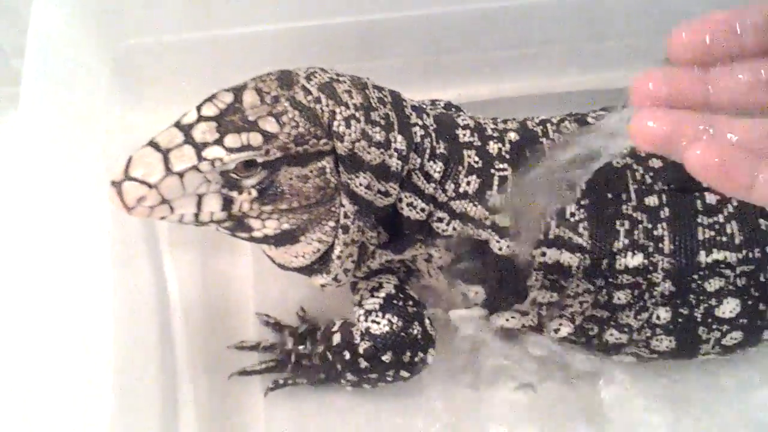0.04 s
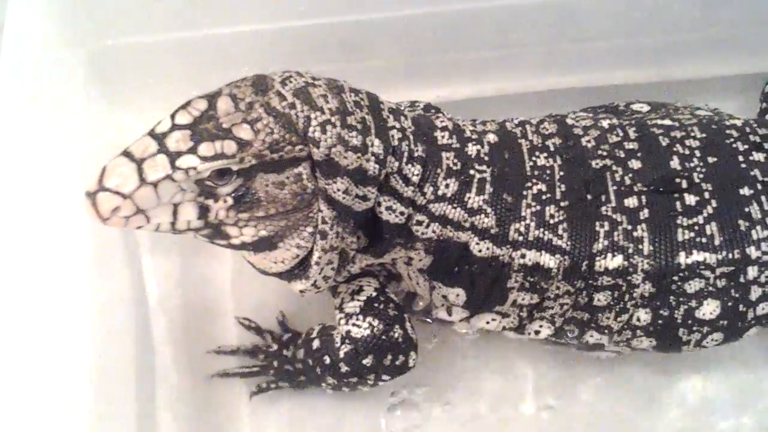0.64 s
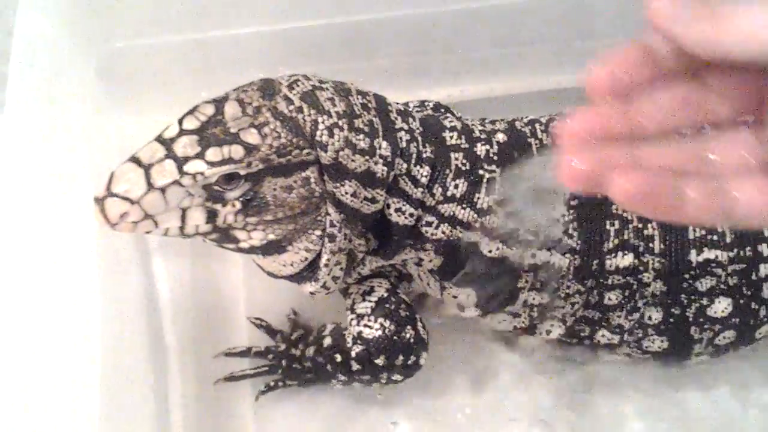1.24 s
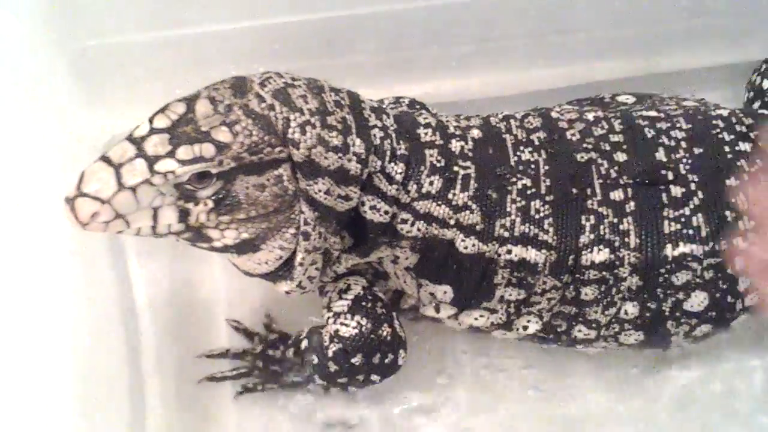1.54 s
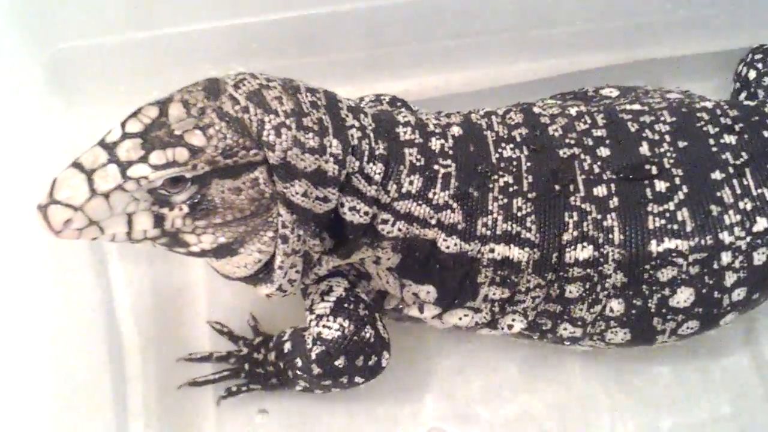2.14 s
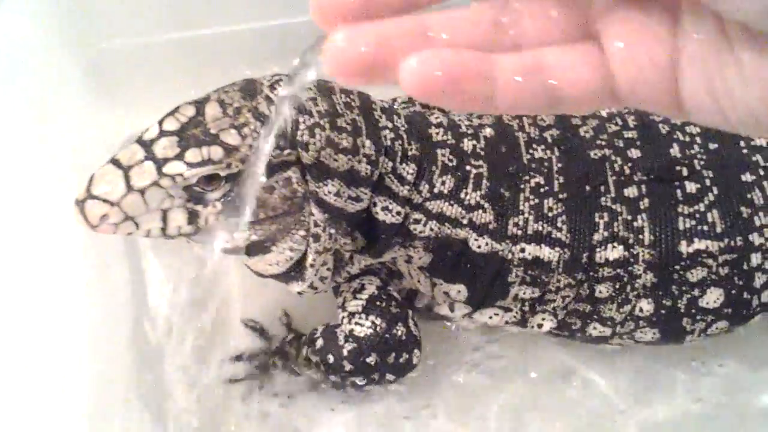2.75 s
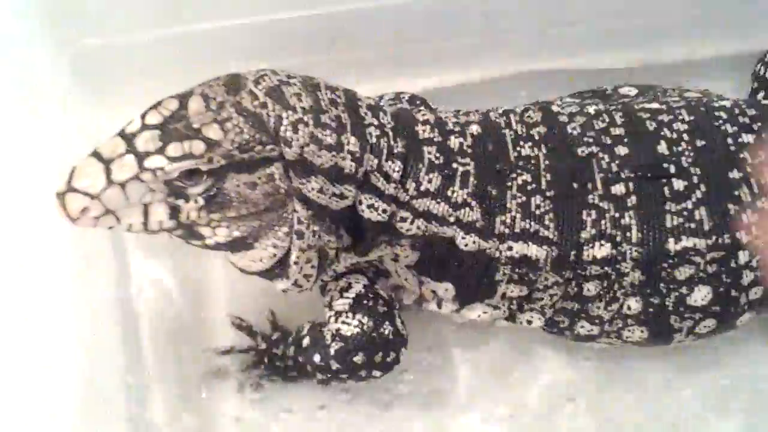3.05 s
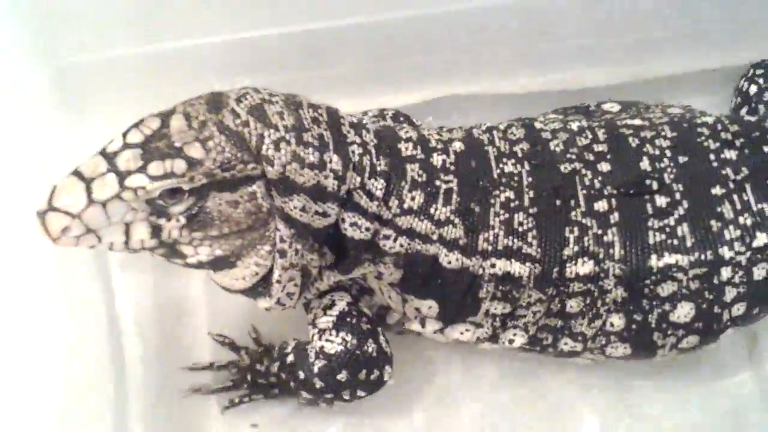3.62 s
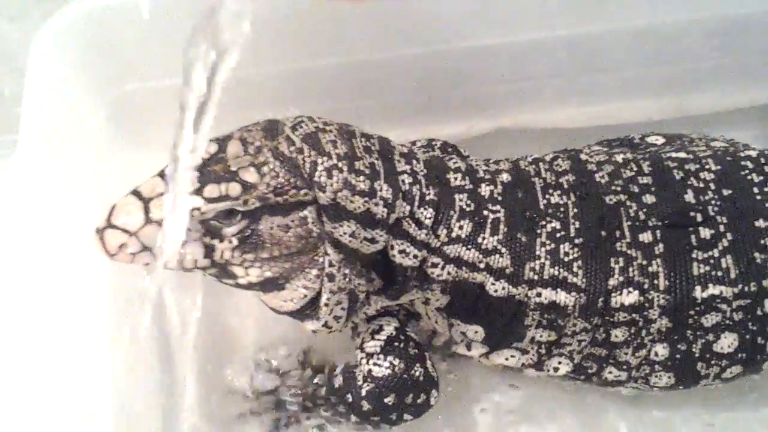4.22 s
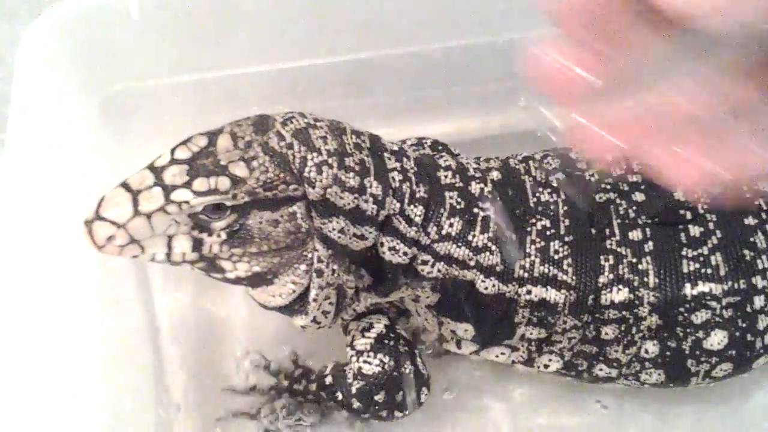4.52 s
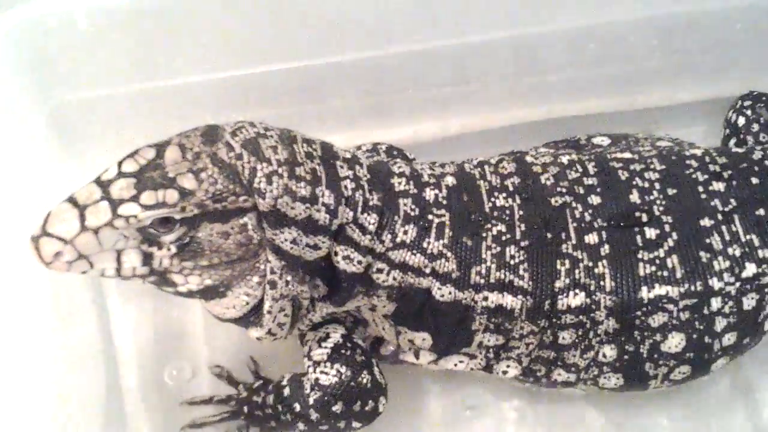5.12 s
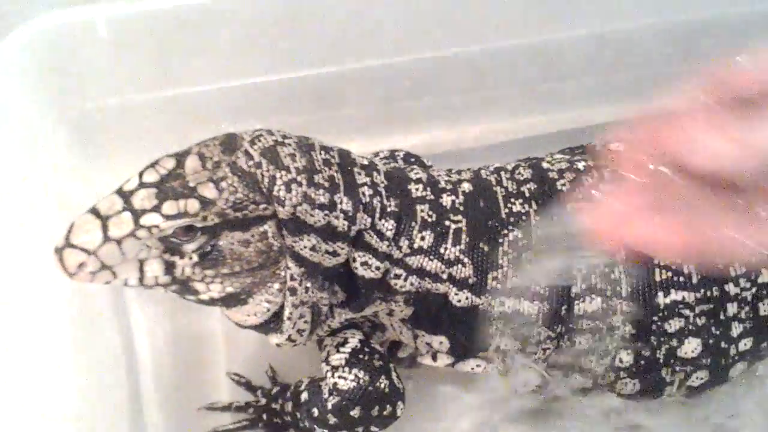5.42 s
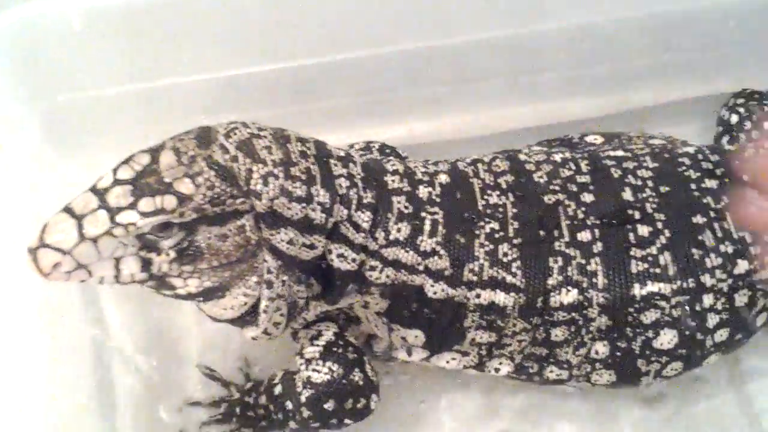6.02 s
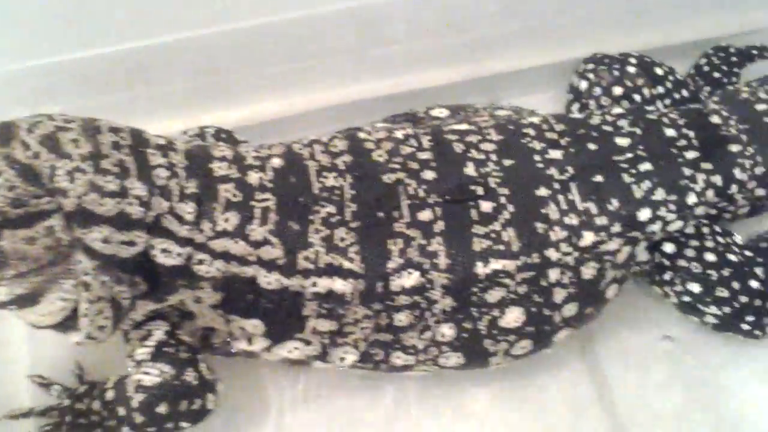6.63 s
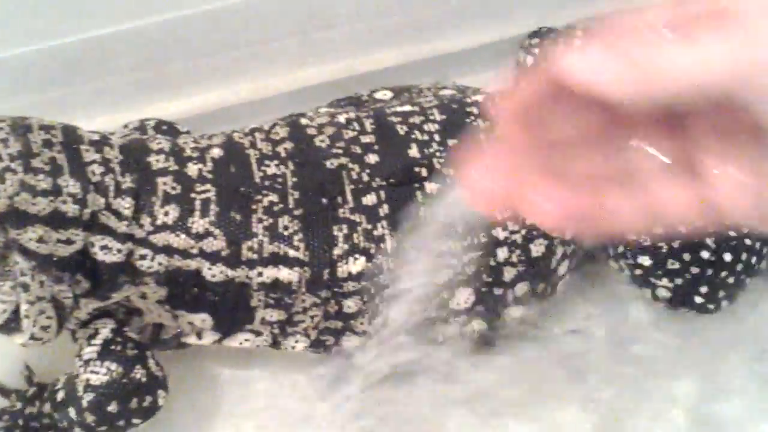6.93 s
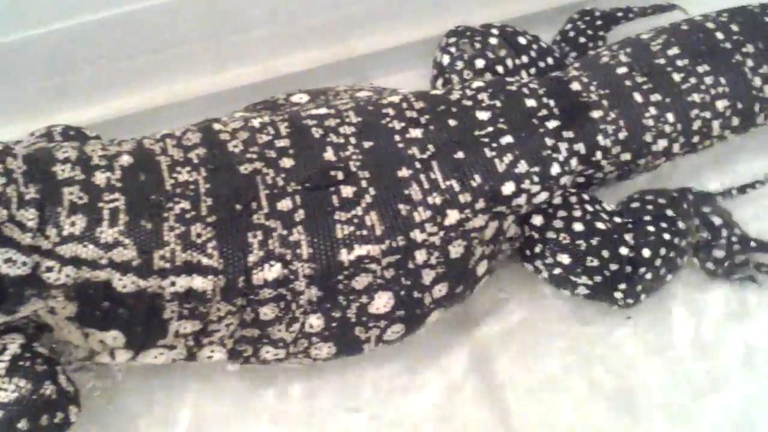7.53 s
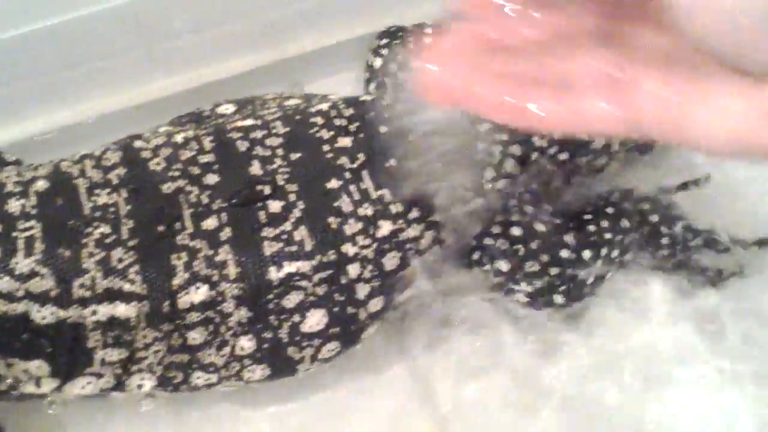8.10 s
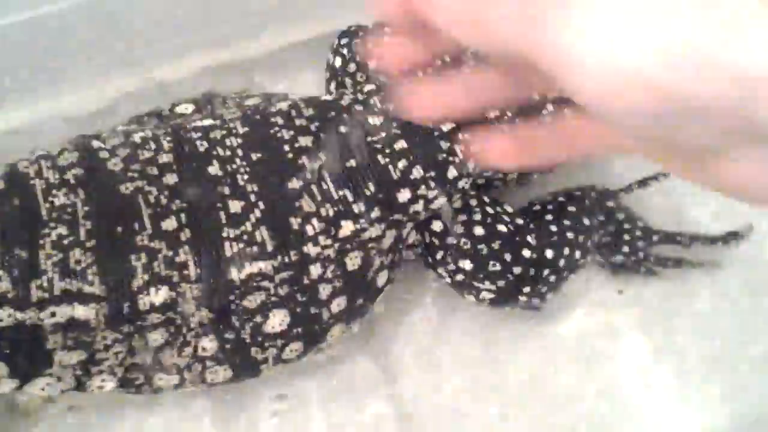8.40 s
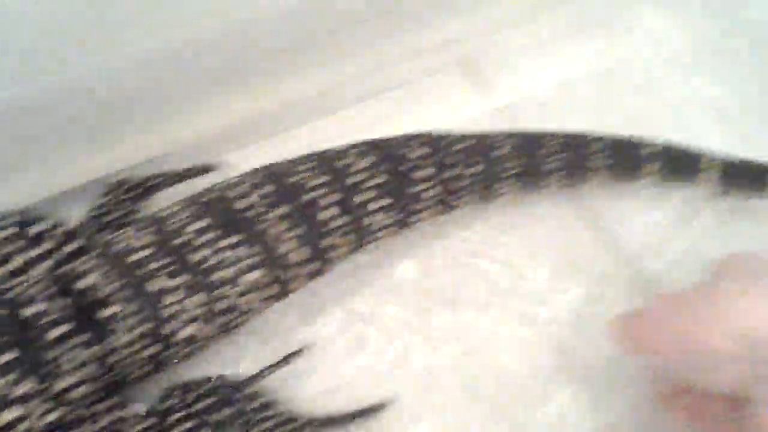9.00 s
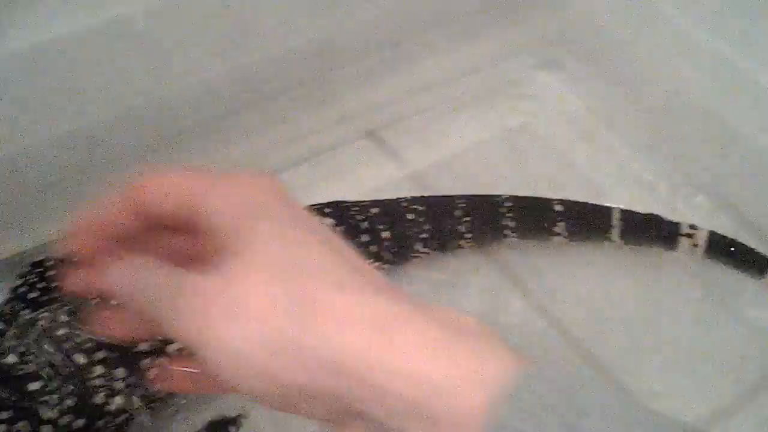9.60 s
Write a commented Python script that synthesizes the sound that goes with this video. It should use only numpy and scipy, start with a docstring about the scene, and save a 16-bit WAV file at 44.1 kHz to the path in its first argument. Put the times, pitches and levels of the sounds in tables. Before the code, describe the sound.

A hand scoops water from a shallow plastic tub and pours it over a large lizard, again and again. Each handful patters and gurgles on scales and water, followed by stray drops that slap and plink. Soft glugs come as the hand dips back in, and about halfway there is one rising plop. The microphone is close, in a small bathroom with a short ring and a faint hush.

```python
"""A small hard-walled bathroom, one mono microphone close to a shallow plastic tub of water.
Over a faint hush, a hand pours a scoop over a large lizard: it gurgles and patters on scales and water,
then stray drops slap and plink. The hand dips in with a run of glugs, lifts and pours, again and again.
About halfway, one big air cavity pinches off with a rising plop, and the scooping carries on.
Tub and walls ring on behind every splash."""
import sys
import numpy as np
from scipy import signal
from scipy.fft import rfft, irfft
from scipy.io import wavfile
from scipy.ndimage import uniform_filter1d

SR = 44100
rng = np.random.default_rng(int(sys.argv[2]) if len(sys.argv) > 2 else 0)


def unload_audio(sound):
    """Save the sound as a 16-bit wav file, at the path given as the first command line argument."""
    columns = np.transpose(np.atleast_2d(sound))
    # keep every value between -1 and 1, then stretch to whole-number steps
    steps = np.round(np.clip(columns, -1, 1) * 32767)
    wavfile.write(sys.argv[1], SR, steps.astype(np.int16))


N = 429975
TIME = np.arange(N) / SR

# the heaviest drops that slap the water; body and spray are relative to the drop's level:
# start_s, level_db, ring_hz, body_db, spray_db
HEAVY_DROPS = [(0.0146, -15, 4920, -14, -17), (0.039, -14.5, 4830, -13, -28), (0.102, -18, 4070, -14, -30),
               (0.2151, -21, 3860, -22, -24), (0.274, -21, 4300, -19, -23), (0.3466, -27.5, 5150, -21, -32),
               (0.8094, -34, 3930, -17, -35), (0.87, -33, 4450, -17, -28), (0.9728, -22.5, 3540, -25, -28),
               (1.018, -23, 4200, -15, -36), (1.083, -29, 4450, -19, -14), (1.106, -27.5, 4150, -15, -16),
               (1.137, -29, 3080, -12, -17), (1.2, -24, 3400, -4.5, -30), (1.3847, -25.5, 2430, -33, -23),
               (1.543, -31.5, 5460, -7.5, -7), (1.5951, -26, 4020, -16.5, -28),
               (1.9092, -24.5, 3560, -10.5, -21), (2.3285, -30, 4640, -5, -12),
               (2.426, -24.5, 4050, -9.5, -20), (2.475, -20.5, 3680, -30, -21),
               (2.4817, -28, 4400, -34, -16), (2.6332, -21, 4700, -22, -19),
               (2.6878, -27, 4840, -10.5, -23), (2.727, -23.5, 3600, -4, -18),
               (2.741, -26.5, 3650, -16, -18), (2.798, -19.5, 2900, -6.5, -18),
               (2.8174, -16.5, 4350, -14, -19), (2.8705, -15.5, 3770, -19, -18),
               (2.9347, -17.5, 4150, -10, -16), (3.345, -33.5, 4480, -30, -14),
               (3.4648, -24, 4330, -1, -29), (3.56, -23.5, 4470, -10, -37), (3.908, -24.5, 4470, -30, -33),
               (4.0062, -22.5, 4160, 1.5, -15), (4.043, -25, 3350, -11, -24),
               (4.071, -19, 4140, -10.5, -13.5), (4.0834, -20.5, 3830, -8, -23),
               (4.1137, -21.5, 4230, -17, -24), (4.1467, -27.5, 4200, 0.5, -22),
               (4.2695, -17.5, 2890, -11, -23), (4.2692, -16.5, 5660, -24, -30),
               (4.297, -13.5, 5250, -31, -25), (4.3334, -15, 3460, -17, -16), (4.3645, -29, 3820, 2.5, -20),
               (4.3942, -19.5, 3460, -5, -36), (4.4283, -19.5, 3370, -12, -19),
               (4.4778, -22, 3800, -10, -12.5), (4.533, -27.5, 4670, -17, -18),
               (4.63, -28.5, 4350, -18, -20), (4.9725, -31, 4200, -1.5, -19), (5.205, -23, 2290, -28, -35),
               (5.237, -31, 4240, -17, -28), (5.313, -28.5, 4200, -3.5, -22), (5.4897, -17, 2380, -30, -22),
               (5.5532, -16.5, 4830, -15, -16), (5.605, -22, 4220, -28, -22), (5.632, -20, 2920, -5, -27),
               (5.695, -15, 3540, -8, -17), (5.72, -23, 3300, 0, -13), (5.8307, -13.5, 4530, -19.5, -21),
               (5.839, -19, 4200, -18, -26), (5.8834, -17, 4860, -16, -34), (5.8894, -14.5, 4180, -7, -21),
               (5.9193, -21, 4100, 0, -20), (6.616, -31, 4730, -10, -35), (6.708, -26.5, 3450, -10, -27),
               (7.23, -21, 2930, -15, -14), (7.3032, -10.5, 4050, -34, -34),
               (7.7973, -28.5, 4400, -27, -22), (7.87, -19.5, 3360, -26, -45), (8.092, -25, 4350, -22, -21),
               (8.108, -20.5, 4200, -23, -20), (8.3074, -22, 5060, -14.5, -36), (8.364, -9, 3760, -17, -22),
               (8.767, -34, 4000, -3.5, -35), (8.7793, -27.5, 3650, -13, -23), (8.869, -25, 3670, -39, -25),
               (8.882, -24.5, 4330, -24, -28), (9.254, -17, 3879, -26, -45), (9.337, -23, 2390, -18, -20),
               (9.473, -23, 4780, -11, -19), (9.5632, -21, 3710, -34, -12), (9.6127, -26, 3380, -29, -31)]
# the larger trapped bubbles: start_s, pitch_hz, level_db, life_ms, rise_fraction
AIR_POCKETS = [(0.016, 1160, -13, 3.3, 0.055), (0.124, 1756, -17.5, 5, 0.026),
               (0.851, 1430, -37.5, 6.3, 0.13), (1.083, 1760, -27, 5.9, 0.05),
               (1.203, 1163, -21.5, 7.4, 0.052), (1.224, 1083, -25.5, 9.7, 0.28),
               (1.274, 1734, -22.5, 5.5, 0.066), (1.969, 1010, -24.5, 11, 0.022),
               (1.987, 3150, -27.5, 4.9, 0.018), (2.228, 737, -27, 17, 0.12), (2.243, 825, -30, 13, 0.32),
               (2.332, 1460, -26, 10, 0.08), (2.52, 1340, -18.5, 6, 0.073), (2.589, 1354, -20.5, 5.1, 0.3),
               (2.701, 1754, -24.5, 5.8, 0.06), (2.908, 1070, -11, 2.04, 0.05),
               (3.466, 1010, -30, 16, 0.054), (3.482, 1690, -23, 3.4, 0.054),
               (3.703, 1072, -26.5, 11.7, 0.32), (3.779, 1348, -14.5, 6, 0.11), (4.203, 830, -21, 3.4, 0.1),
               (4.274, 1420, -18, 3.9, 0.04), (4.397, 426, -22.5, 10.8, 0.22),
               (4.463, 1820, -23, 3.7, 0.055), (4.512, 900, -30, 10, 0.3), (5.047, 850, -24, 5.4, 0.39),
               (5.109, 1010, -29, 6.1, 0.11), (5.246, 1450, -24, 3.9, 0.062), (5.489, 1910, -19, 4.7, 0.05),
               (5.532, 2094, -26.5, 12, 0.05), (5.581, 1860, -17, 4.9, 0.045),
               (6.615, 2910, -21, 2.8, 0.08), (6.707, 986, -19.5, 6.5, 0.054),
               (6.763, 1430, -16.5, 2.9, 0.08), (6.8, 1675, -21.5, 6, 0.068),
               (6.899, 900, -22.5, 11.5, 0.26), (6.929, 1810, -23.5, 5.9, 0.11),
               (6.971, 1008, -28.5, 14, 0.36), (7.162, 1020, -25, 4, 0.05), (7.268, 1014, -32, 19, 0.64),
               (7.586, 2150, -31.5, 3.7, 0.03), (7.592, 2000, -32.5, 5.1, 0.06),
               (7.601, 1570, -37, 6.4, 0.03), (7.853, 1860, -32.5, 4.7, 0.11),
               (7.974, 1360, -21.5, 4.4, 0.1), (8.215, 813, -36.5, 14, 0.033),
               (8.478, 1800, -27.5, 5.2, 0.2), (8.8, 883, -29.5, 9, 0.1), (8.816, 770, -28.5, 14, 0.21),
               (9.215, 1040, -31.5, 5.3, 0.1), (9.286, 2070, -24.5, 5.9, 0.04),
               (9.337, 1670, -19, 3.8, 0.045), (9.614, 1240, -27, 5.3, 0.037)]
# the hand going under: start_s, length_s, first_hz, last_hz, glug_db, stir_db
HAND_DIPS = [(0.641, 0.023, 1350, 385, -40, -59.5), (1.881, 0.05, 2700, 294, -40.5, -48),
             (3.383, 0.067, 2440, 453, -41.5, -52.5), (4.958, 0.052, 2230, 410, -38.5, -54),
             (5.115, 0.028, 2800, 1510, -40, -47), (6.4, 0.08, 1800, 288, -39.5, -58.5),
             (7.62, 0.03, 1170, 260, -40, -60.5), (8.773, 0.036, 2000, 1080, -41, -48.5),
             (9.194, 0.042, 2040, 1620, -31.5, -54)]


def undb(db):
    """Decibels to gain."""
    return 10 ** (np.asarray(db) / 20)


def unit(x):
    """Scale to rms 1."""
    return x / np.sqrt(np.mean(x ** 2))


def add(track, start_s, sound):
    """Mix a sound into the track."""
    start = int(np.clip(start_s * SR, 0, N - 1))
    track[start:start + len(sound)] += sound[:N - start]


def colour(x, points):
    """Shape a sound by rows of frequency_hz, gain_db; the filter is causal, so attacks stay sharp."""
    size = 8192
    hz, db = np.transpose(points)
    bin_hz = np.arange(size // 2 + 1) * SR / size + 1
    log_gain = np.log(undb(np.interp(np.log(bin_hz), np.log(hz), db)))
    cepstrum = irfft(log_gain)[:size // 2]
    response = irfft(np.exp(rfft(np.r_[cepstrum[0], 2 * cepstrum[1:]], size)))
    return signal.fftconvolve(x, response)[:len(x)]


def burst(age, lo_hz, hi_hz, swell_s):
    """An impact: a band of noise that swells and dies away."""
    spectrum = rfft(rng.standard_normal(len(age)))
    hz = np.arange(len(spectrum)) * SR / len(age) + 1
    band = 1 / (1 + (lo_hz / hz) ** 8) / (1 + (hz / hi_hz) ** 8)
    fade = (age / swell_s * np.exp(1 - age / swell_s)) ** 2
    return unit(irfft(spectrum * band, len(age)) * fade) * np.sqrt(np.mean(fade ** 2))


def bubbles(start_s, hz, db, life_s, rise):
    """One bubble per entry: each rings, climbs in pitch as it nears the surface, and bursts."""
    start_s, hz, db, life_s, rise = np.broadcast_arrays(start_s, hz, db, life_s, rise)
    samples = (2 * life_s * SR).astype(int) + 2
    # all bubbles end to end: which one a sample belongs to, and how far into it
    which = np.repeat(np.arange(len(start_s)), samples)
    step = np.arange(len(which)) - (np.cumsum(samples) - samples)[which]
    spent, cycles = step / SR / life_s[which], step / SR * hz[which]
    ring = np.sin(2 * np.pi * cycles * (1 + rise[which] * spent ** 2 / 3))
    envelope = (1 - np.exp(-cycles)) * np.exp(-spent ** 3)
    start = np.maximum(start_s * SR, 0).astype(int)
    return np.bincount(start[which] + step, undb(db)[which] * envelope * ring, N)[:N]


def gate(start_s, end_s, fall_db_per_s, rise_db_per_s=272):
    """Gain that climbs to 1 by the start, holds, and dies away after the end."""
    early_s, late_s = np.maximum(start_s - TIME, 0), np.maximum(TIME - end_s, 0)
    return undb(-rise_db_per_s * early_s - fall_db_per_s * late_s)


def room_tone():
    """The faint, steady, low hush of the bathroom."""
    # spectrum of the hush: frequency_hz, gain_db
    hush_spectrum = [(20, -16), (40, -3.5), (75, -4.5), (130, 3), (220, 5), (400, 4), (800, -1),
                     (1500, -12.5), (3000, -19), (5000, -7), (6500, -12.5), (13500, -8.5), (15000, -18)]
    return undb(-59.5) * unit(colour(rng.standard_normal(N), hush_spectrum))


def handful(lift_s, pour_s, empty_s, swell_db, sag_db):
    """Gain of one scoop: it is gathered, leaks through the fingers, pours thinner, runs off the scales."""
    gather = undb(-14) * gate(lift_s - 0.11, lift_s, fall_db_per_s=161)
    shape = undb(np.interp(TIME, [lift_s, pour_s, empty_s], [-swell_db, 0, -sag_db]))
    stream = gate(lift_s, empty_s, fall_db_per_s=161)
    runoff = undb(-8) * gate(lift_s, empty_s, fall_db_per_s=49.5)
    return np.maximum(shape * np.maximum(stream, runoff), gather)


def flow():
    """How hard the water patters, gurgles, sloshes and sprays as the hand dips, lifts and pours."""
    # scoops lifted and tipped out: lift_s, pour_s, empty_s, gurgle_db, patter_db, spray_db
    scoops = [(0.0, 0.036, 0.14, -40, -30.5, -62), (1.016, 1.234, 1.395, -43, -37, -51),
              (2.215, 2.253, 2.435, -44.5, -41.5, -56), (2.478, 2.534, 2.63, -41.5, -31.5, -48),
              (2.788, 2.813, 2.922, -42, -35.5, -54), (3.696, 4.042, 4.57, -40.5, -37, -49.5),
              (5.212, 5.26, 5.37, -42.5, -39.5, -52), (5.511, 5.69, 5.7, -44, -34.5, -43.5),
              (6.744, 7.05, 7.326, -38.5, -33.5, -46.5), (7.964, 8.132, 8.21, -43.5, -34.5, -45),
              (9.307, 9.49, 9.66, -45.5, -36.5, -54.5)]
    # the bath heaving against the tub: start_s, length_s, level_db
    heaves = [(0.01, 0.058, -46.5), (2.784, 0.24, -52), (3.413, 0.021, -49.5), (4.228, 0.23, -44),
              (4.99, 0.055, -45), (5.562, 0.22, -54), (5.826, 0.083, -43.5), (7.1, 0.15, -49),
              (8.37, 0.057, -49), (8.806, 0.021, -50.5)]
    patter, gurgle, spray = np.zeros((3, N))
    for *times, gurgle_db, patter_db, spray_db in scoops:
        patter += undb(patter_db) * handful(*times, swell_db=3.5, sag_db=4)
        gurgle += undb(gurgle_db) * handful(*times, swell_db=-0.5, sag_db=2.5)
        spray += undb(spray_db) * handful(*times, swell_db=6.5, sag_db=2)
    stir = sum(undb(db) * gate(start_s + length_s / 2, start_s + length_s + 0.004, fall_db_per_s=86)
               for start_s, length_s, *_, db in HAND_DIPS)
    slosh = sum(undb(db) * gate(start_s, start_s + length_s, fall_db_per_s=153)
                for start_s, length_s, db in heaves)
    return (np.hypot(patter, stir), np.hypot(gurgle, undb(3) * stir),
            np.hypot(slosh, undb(-24.5) * patter), np.hypot(spray, undb(-8.5) * stir))


def swarm(per_s, lo_hz, hi_hz, cycles, rise, spread_db):
    """A stream of bubbles of random size, mostly faint, each living for about the given cycles."""
    when, size, life, lift, force = rng.random((int(per_s * N / SR), 5)).T
    hz = lo_hz * (hi_hz / lo_hz) ** size
    life_s = cycles * (.5 + life) / hz
    return unit(bubbles(when * N / SR, hz, spread_db * force ** 3, life_s, 2 * rise * lift))


def wash():
    """Countless tiny droplets merge into a noise whose strength flutters."""
    flutter = signal.sosfilt(signal.butter(2, 90, fs=SR, output="sos"), rng.standard_normal(N))
    return unit(rng.standard_normal(N) * undb(3.7 * unit(flutter)))


def running_water(patter_gain, gurgle_gain, slosh_gain, spray_gain):
    """The pour patters and sprays, trapped air gurgles, and the bath sloshes round the hand."""
    # spectra of the four voices of the water: frequency_hz, gain_db
    patter_spectrum = [(500, -34), (1500, -7.5), (2600, -6.5), (3400, -2), (4500, 3), (5500, 0),
                       (6800, -11), (9000, -7.5), (15000, -25)]
    gurgle_spectrum = [(450, -7), (750, -18), (1100, 3), (1500, 11.5), (1900, 11.5), (2500, -6.5),
                       (3500, -26.5)]
    slosh_spectrum = [(90, -25), (160, -22), (270, -11.5), (420, -7), (600, -3.5), (780, 6), (1200, -16.5)]
    spray_spectrum = [(4000, -23), (7500, 0.5), (10500, 2.5), (14000, -3)]
    fizz = swarm(per_s=380, lo_hz=1800, hi_hz=6800, cycles=6.2, rise=0.071, spread_db=20.5)
    patter = unit(colour(fizz + undb(-6.5) * wash(), patter_spectrum))
    blips = swarm(per_s=420, lo_hz=696, hi_hz=2910, cycles=4.5, rise=0.15, spread_db=16.5)
    gurgle = unit(colour(blips + undb(-7.5) * wash(), gurgle_spectrum))
    glugs = swarm(per_s=240, lo_hz=206, hi_hz=900, cycles=1.52, rise=0.17, spread_db=10.5)
    slosh = unit(colour(glugs, slosh_spectrum))
    # the smallest bubbles ring for a few milliseconds; droplets on bare scales just tick
    mist = swarm(per_s=300, lo_hz=6730, hi_hz=14300, cycles=30, rise=0.038, spread_db=16)
    ticks = swarm(per_s=140, lo_hz=7500, hi_hz=13500, cycles=3.5, rise=.05, spread_db=18)
    spray = unit(colour(mist + 0.87 * ticks + undb(-2.5) * wash(), spray_spectrum))
    return (undb(-0.5) * (patter_gain * patter + slosh_gain * slosh)
            + undb(-2.5) * (gurgle_gain * gurgle + spray_gain * spray))


def light_drops(patter_gain, per_s=9):
    """Lighter drops fall at random, as hard as the water patters; columns as in HEAVY_DROPS."""
    when, force, size, depth = rng.random((int(per_s * N / SR), 4)).T
    patter_db = 20 * np.log10(patter_gain[(when * N).astype(int)] + 1e-9)
    level_db = patter_db + 5.5 + 3.5 * (2 * force - 1)
    ring_hz = 4030 * np.exp(.5 * (size - .5))
    tilt_db = 20 * (depth - .5)  # deeper drops have more body and less spray
    return np.c_[when * N / SR, level_db, ring_hz, -24 + tilt_db, -10.5 - tilt_db]


def slaps(patter_gain):
    """Each drop cracks on the surface, knocks the water below, throws spray and rings a tiny bubble."""
    out, age = np.zeros(N), np.arange(SR // 40) / SR
    drops = np.vstack([HEAVY_DROPS, light_drops(patter_gain)])
    for start_s, db, hz, body_db, spray_db in drops:
        crack = undb(-5) * burst(age, hz * 0.7, hz * 1.274, swell_s=0.0015)
        body = undb(body_db) * burst(age, 780, 2220, swell_s=0.0018)
        spray = undb(spray_db - 2.5) * burst(age, 5700, 12000, swell_s=0.003)
        add(out, start_s, undb(db) * (crack + body + spray))
    start_s, db, hz, *_ = drops.T
    return out + bubbles(start_s + .0005, hz, db - 2, life_s=0.0023, rise=0.19)


def splashback(start_s, db, peak_s=0.016):
    """Gain of the droplets or froth that follow each event: it builds for a moment, then settles."""
    thrown = np.bincount((np.maximum(start_s, 0) * SR).astype(int), undb(db), N)
    flight = np.arange(SR // 4) / SR / peak_s
    return signal.fftconvolve(thrown, flight * np.exp((1 - flight ** 2) / 2))[:N]


def air_pockets():
    """The larger pockets of trapped air ring as short rising plops."""
    start_s, hz, db, life_ms, rise = np.transpose(AIR_POCKETS)
    return bubbles(start_s, hz, db, life_ms / 1000, rise)


def spits():
    """Fine droplets burst on the scales: the hard ones as a broad tick, the soft ones as a thin tink."""
    # the sharpest droplets: start_s, strength_db, pitch_hz
    droplets = [(0.0532, -18, 11000), (0.063, -25, 10200), (0.233, -29, 9900), (0.265, -28, 9900),
                (0.399, -31, 9000), (1.232, -29, 10500), (1.351, -26, 9500), (1.373, -25, 9250),
                (1.532, -28.5, 11600), (1.5893, -28, 12000), (2.209, -27.5, 7900), (2.2734, -29, 9800),
                (2.490, -22, 10900), (2.543, -32, 8700), (2.817, -18.5, 11000), (2.8726, -19.5, 8850),
                (2.989, -19.5, 10900), (3.4321, -27, 8000), (3.477, -22.5, 9300), (3.742, -27, 10300),
                (4.003, -26, 9600), (4.085, -23, 9700), (4.140, -26, 10000), (4.1773, -23, 11000),
                (4.187, -24, 10700), (4.227, -27, 13000), (4.298, -23, 10000), (4.337, -27, 10900),
                (4.364, -22.5, 7540), (4.459, -19.5, 9400), (5.248, -32, 9150), (5.5502, -24, 8560),
                (5.598, -29, 9200), (5.714, -18.5, 9500), (5.768, -26, 11000), (5.807, -24, 7400),
                (5.831, -15, 9500), (5.9197, -15.5, 9800), (6.785, -27.5, 10400), (6.995, -24, 11600),
                (7.010, -23, 10100), (7.139, -28, 9300), (7.162, -21.5, 10200), (7.280, -29, 11100),
                (7.296, -22, 9300), (7.302, -23, 10000), (7.319, -22, 11200), (7.478, -29.5, 7000),
                (8.2767, -23, 10500), (8.446, -28, 10100), (9.540, -24, 7400), (9.657, -30, 7800)]
    out, age = np.zeros(N), np.arange(SR // 80) / SR
    for start_s, db, hz in droplets:
        octaves = 2.6 * undb(db) ** 0.65
        edge_ratio = 2 ** (octaves / 2)
        add(out, start_s, undb(db - 7.5) * burst(age, hz / edge_ratio, hz * edge_ratio, swell_s=0.0008))
    return out


def drips():
    """Each lone drip traps a tiny bubble that plinks for about eight cycles."""
    # single drips into the tub: start_s, pitch_hz, level_db
    plinks = [(0.183, 4500, -21), (0.319, 5040, -22.5), (0.584, 5170, -36.5), (0.616, 2100, -45),
              (1.114, 1800, -33), (1.336, 2980, -26), (1.454, 4900, -33), (1.470, 5300, -28),
              (1.579, 4600, -28), (1.855, 3630, -37), (2.146, 3650, -32), (2.166, 4250, -31),
              (2.195, 5000, -28), (2.356, 3000, -27), (2.517, 4730, -16), (2.901, 5240, -19),
              (3.100, 5870, -29.5), (3.778, 1890, -29), (3.834, 5040, -17.5), (3.938, 4900, -23),
              (3.985, 2790, -23.5), (4.061, 4260, -21), (4.127, 4760, -19), (4.456, 3220, -26),
              (4.935, 3200, -40), (4.987, 2890, -31), (5.139, 2330, -29), (5.451, 4520, -26),
              (5.682, 2080, -23), (5.770, 5800, -19.5), (5.819, 3100, -22.5), (6.571, 1640, -42),
              (6.698, 3640, -24), (6.796, 3560, -22), (7.103, 4400, -15.5), (7.193, 4400, -16),
              (7.203, 2970, -20.5), (7.5805, 4680, -30.5), (7.652, 2460, -37), (7.852, 4730, -26),
              (8.001, 3050, -26), (8.2116, 4860, -21.5), (8.309, 5400, -17.5), (8.399, 3630, -19),
              (8.406, 4850, -22), (8.798, 2900, -32), (8.987, 2530, -37), (9.213, 1700, -36),
              (9.386, 3570, -24), (9.4916, 4900, -20)]
    start_s, hz, db = np.transpose(plinks)
    return bubbles(start_s, hz, db, life_s=8.1 / hz, rise=0.023)


def hand_dips():
    """The hand slides under, trapping ever larger pockets: ragged glugs, lower and softer with depth."""
    out, depth = np.zeros(N), np.linspace(0, 1, 12)
    for start_s, length_s, first_hz, last_hz, db, _ in HAND_DIPS:
        late, detune, force = rng.uniform(-0.99, 1, (3, len(depth)))
        glug_s = start_s + length_s * depth + 0.00606 * late
        hz = first_hz * (last_hz / first_hz) ** depth * np.exp(0.37 * detune)
        out += bubbles(glug_s, hz, db - 6 * depth + 4 * force, life_s=0.0033 + 1 / hz, rise=0.065)
    return out


def cavity_plop(start_s):
    """One big cavity pinches off: its pitch holds, then shoots up as it reaches the surface."""
    low_hz, top_hz = 692, 1910
    turn_s, swoop_s, life_s = 0.017, 0.00353, 0.026
    out, age = np.zeros(N), np.arange(int(2 * life_s * SR)) / SR
    pitch_hz = low_hz + (top_hz - low_hz) / (1 + np.exp((turn_s - age) / swoop_s))
    cycles = np.cumsum(pitch_hz) / SR
    envelope = (1 - np.exp(-2 * cycles)) * np.exp(-(age / life_s) ** 6)
    add(out, start_s, undb(-18) * envelope * np.sin(2 * np.pi * cycles))
    return out


def around_the_tub(x, spots, switch_s):
    """The water strikes a few spots in turn, so its echoes keep changing; one track a spot."""
    spot = (TIME / switch_s).astype(int) % spots
    return [x * uniform_filter1d(1. * (spot == k), size=180) for k in range(spots)]


def bathroom(x, tub_db, tub_decay_s, tail_db, t60_s):
    """Close direct sound, quick reflections off the tub sides, then the ring of the hard walls."""
    # standing waves between tub and walls: pitch_hz, strength_db, t60_s
    standing_waves = [(255, -76, 0.78), (430.5, -50, 0.33), (538, -54.5, 0.63), (738, -66, 0.45)]
    # tone of the echoes: frequency_hz, gain_db
    echo_spectrum = [(150, -2), (800, 1), (2500, 1.5), (4800, 0.5), (7000, -2.5), (14000, -6)]
    age = np.arange(SR) / SR
    near, far = rng.standard_normal((2, SR))
    tub = near * np.exp(-age / tub_decay_s) * (age > .0012)
    tail = far * undb(-60 * age / t60_s) * (1 - np.exp(-age / 0.00098))
    echoes = (undb(tub_db) * unit(tub) + undb(tail_db) * unit(tail)) / np.sqrt(SR)
    response = (age == 0) + colour(echoes, echo_spectrum)
    # tub and walls ring evenly in colour, with no broad peaks or dips
    power = uniform_filter1d(np.abs(rfft(response)) ** 2, size=120)
    flatten_db = -10 * np.log10(power / uniform_filter1d(power, size=2500))
    response = colour(response, np.c_[np.arange(len(power)) + 1, flatten_db])
    modes = sum(undb(db - 60 * age / t60) * np.cos(2 * np.pi * hz * age) for hz, db, t60 in standing_waves)
    return signal.fftconvolve(x, response + undb(-4) * modes)[:N]


def scene():
    """Water and room tone at the close microphone, the same in both channels."""
    patter_gain, gurgle_gain, slosh_gain, spray_gain = flow()
    slap_s, slap_db, *_ = np.transpose(HEAVY_DROPS)
    pocket_s, _, pocket_db, *_ = np.transpose(AIR_POCKETS)
    # slaps throw up droplets that patter back; large pockets break into froth that gurgles
    patter_with_droplets = np.hypot(patter_gain, splashback(slap_s, slap_db - 25))
    gurgle_with_froth = np.hypot(gurgle_gain, splashback(pocket_s, pocket_db - 26))
    sources = running_water(patter_with_droplets, gurgle_with_froth, slosh_gain, spray_gain)
    sources += hand_dips() + slaps(patter_gain) + spits() + drips()
    sources += air_pockets() + cavity_plop(start_s=4.618)
    water = sum(bathroom(part, tub_db=-2.5, tub_decay_s=0.0038, tail_db=-3, t60_s=0.54)
                for part in around_the_tub(sources, spots=3, switch_s=0.04))
    # so small a body of water radiates almost no bass
    water = signal.sosfilt(signal.butter(2, 150, "high", fs=SR, output="sos"), water)
    return np.tile(water + room_tone(), (2, 1))


def record(dry):
    """The recorder cuts the treble steeply above 14.8 kHz."""
    return signal.sosfilt(signal.ellip(8, .2, 70, 14800, fs=SR, output="sos"), dry)


dry = scene()
out = record(dry)
unload_audio(out)
```